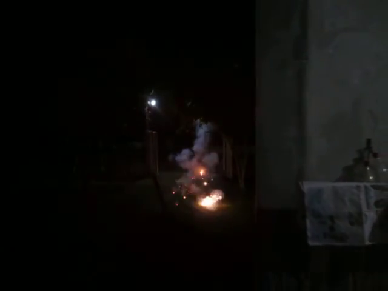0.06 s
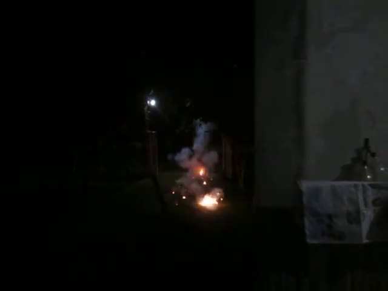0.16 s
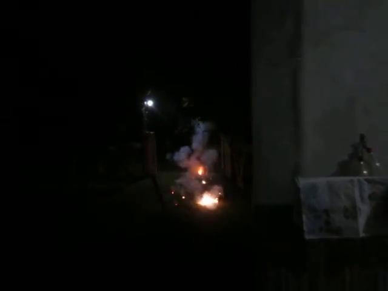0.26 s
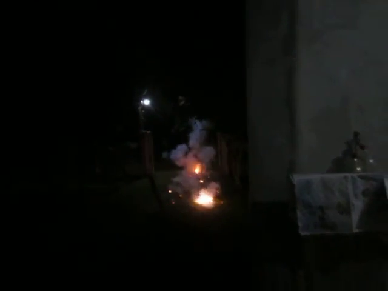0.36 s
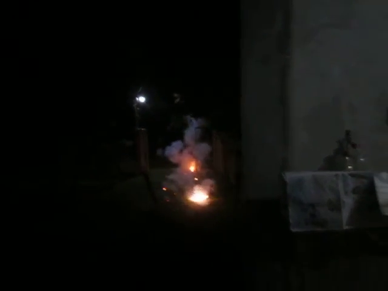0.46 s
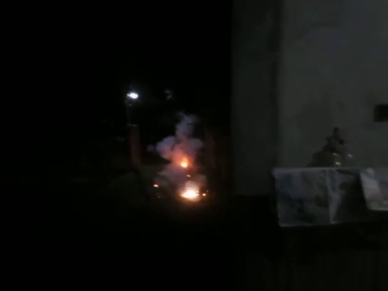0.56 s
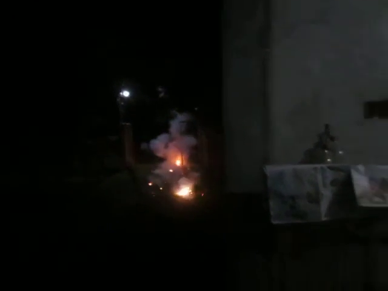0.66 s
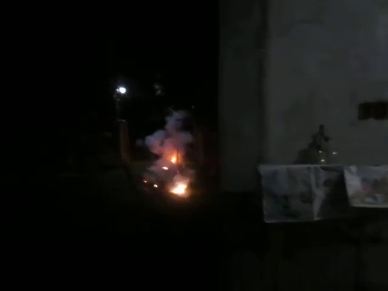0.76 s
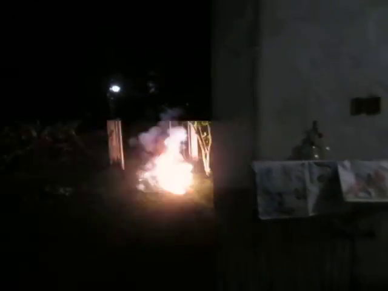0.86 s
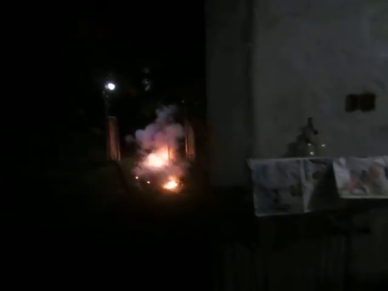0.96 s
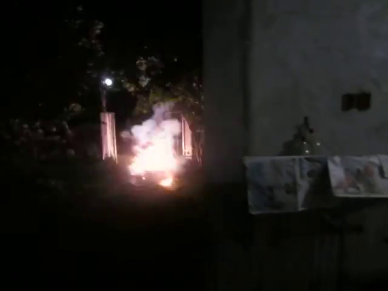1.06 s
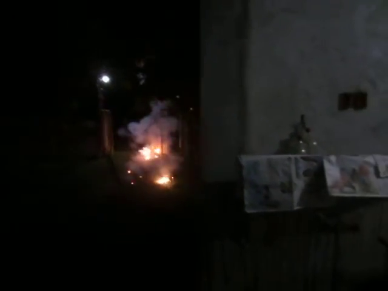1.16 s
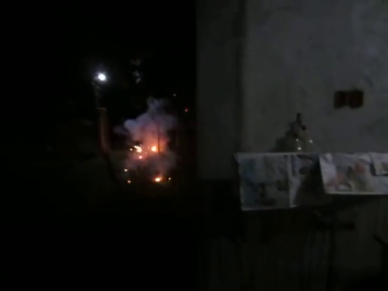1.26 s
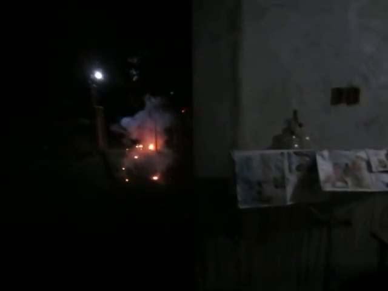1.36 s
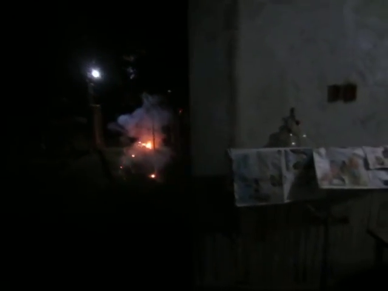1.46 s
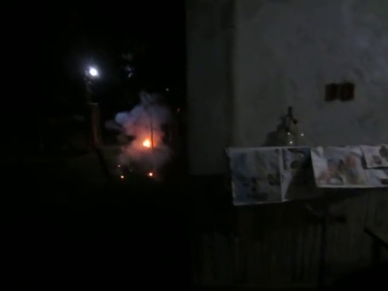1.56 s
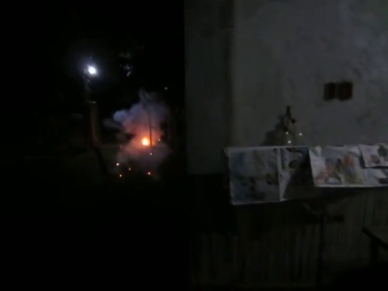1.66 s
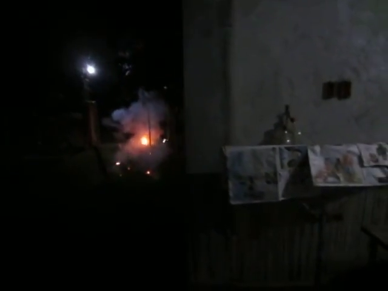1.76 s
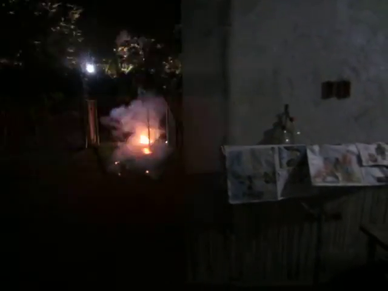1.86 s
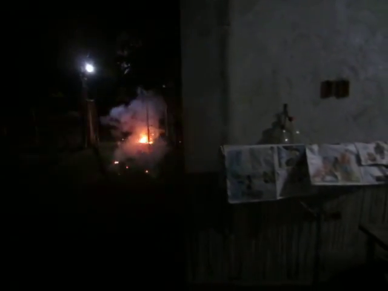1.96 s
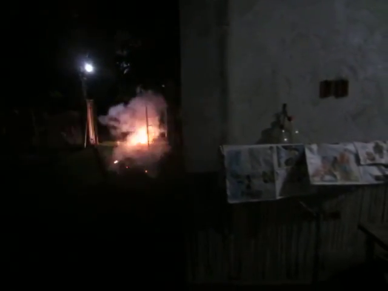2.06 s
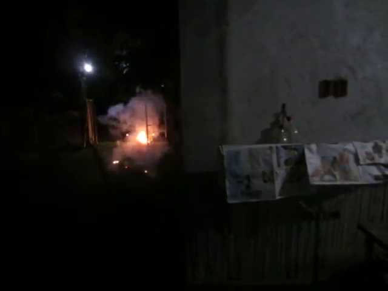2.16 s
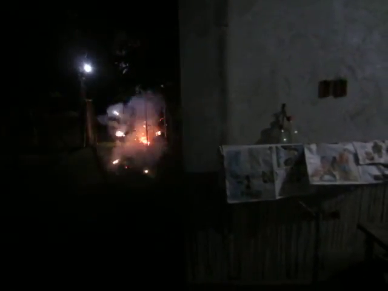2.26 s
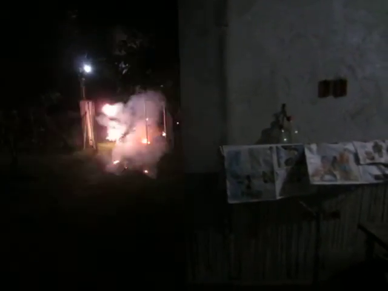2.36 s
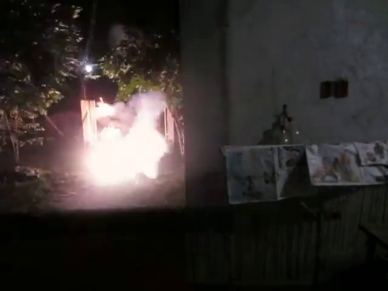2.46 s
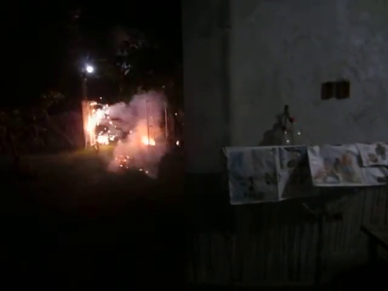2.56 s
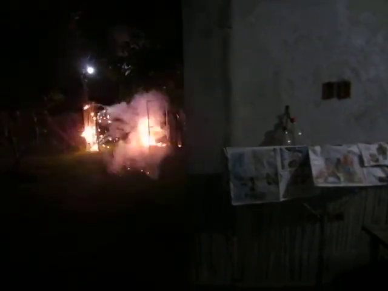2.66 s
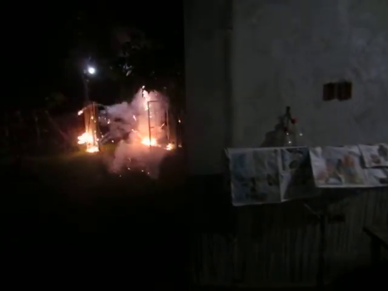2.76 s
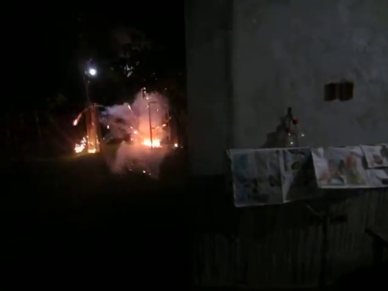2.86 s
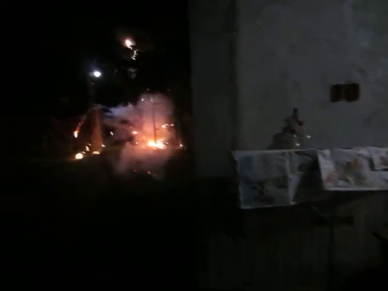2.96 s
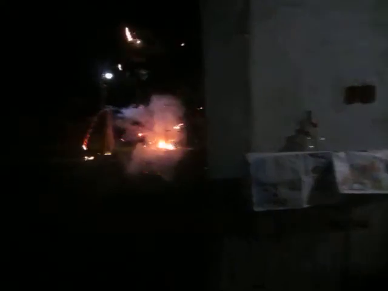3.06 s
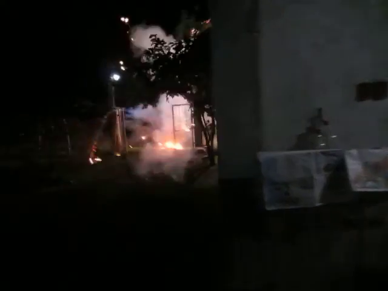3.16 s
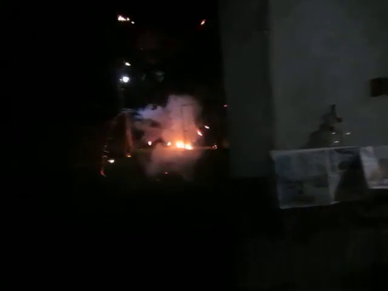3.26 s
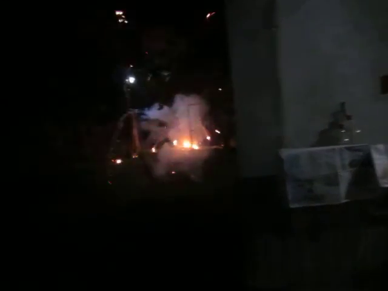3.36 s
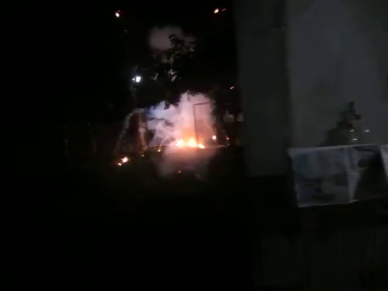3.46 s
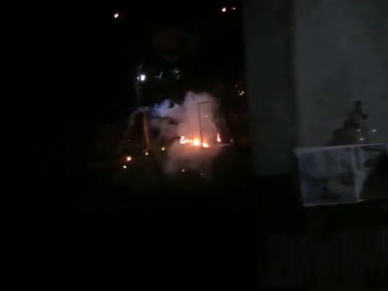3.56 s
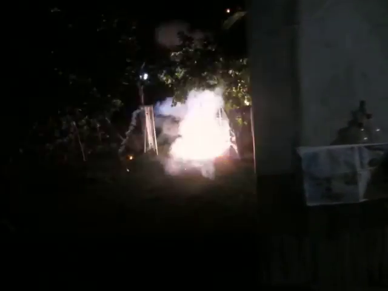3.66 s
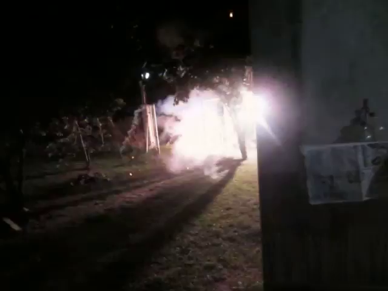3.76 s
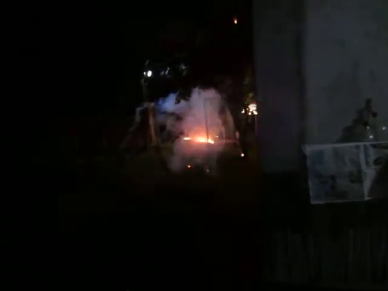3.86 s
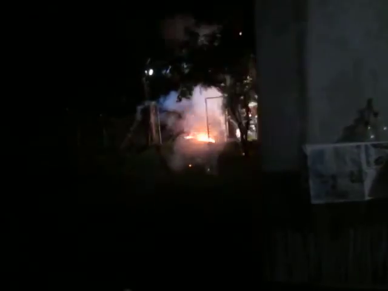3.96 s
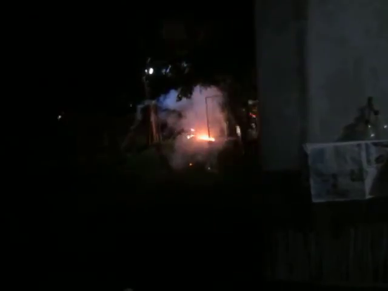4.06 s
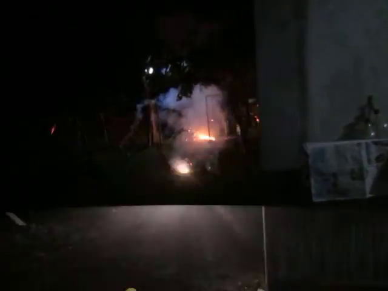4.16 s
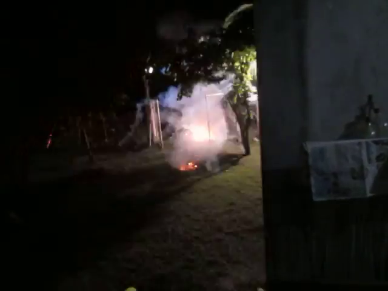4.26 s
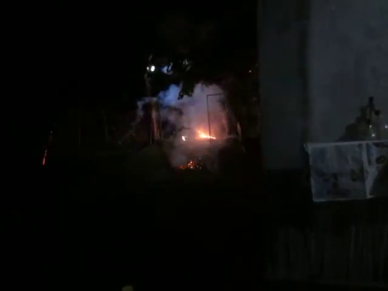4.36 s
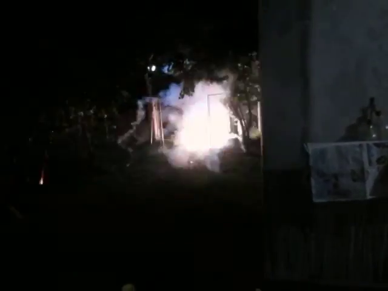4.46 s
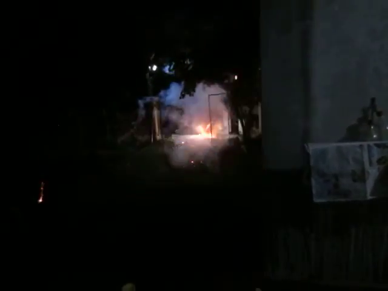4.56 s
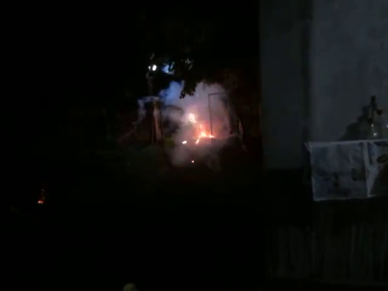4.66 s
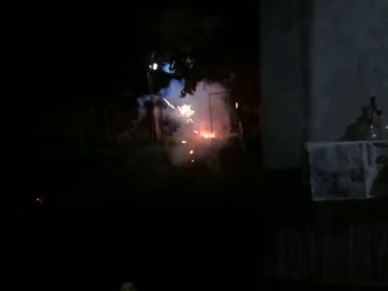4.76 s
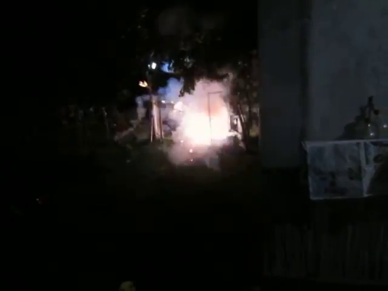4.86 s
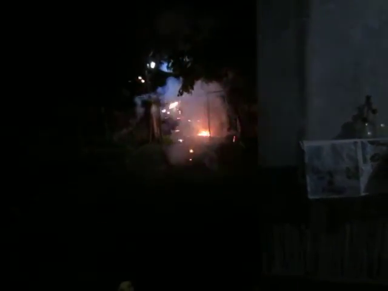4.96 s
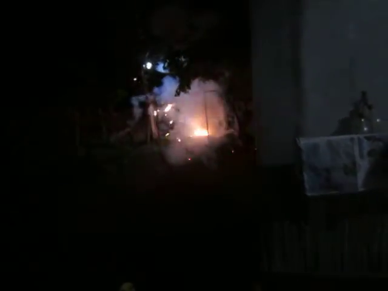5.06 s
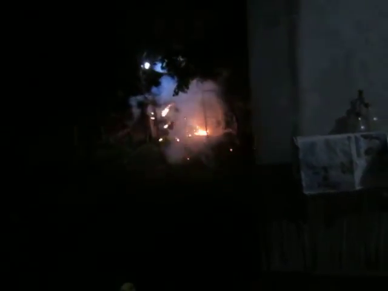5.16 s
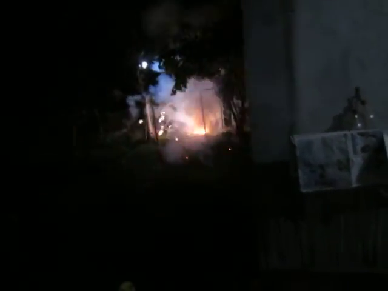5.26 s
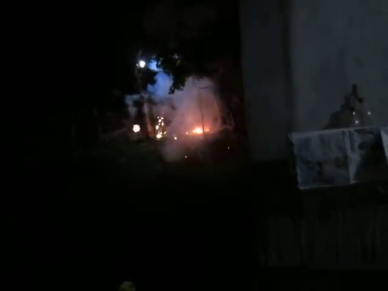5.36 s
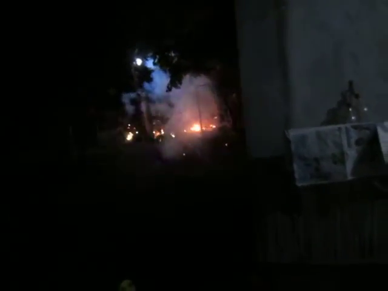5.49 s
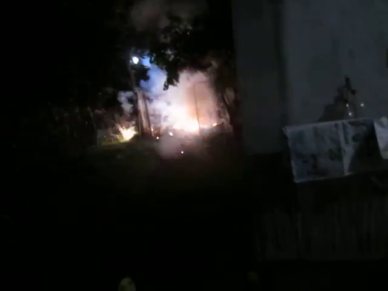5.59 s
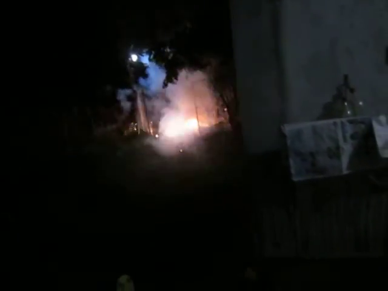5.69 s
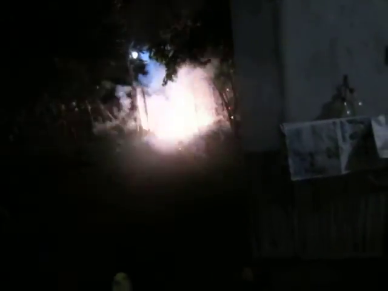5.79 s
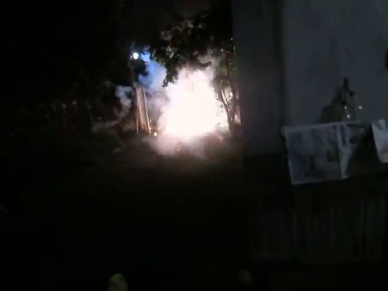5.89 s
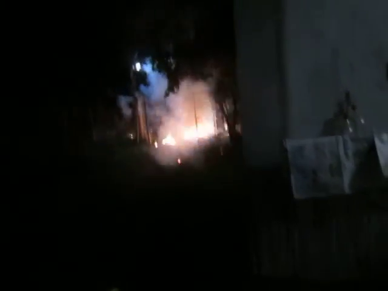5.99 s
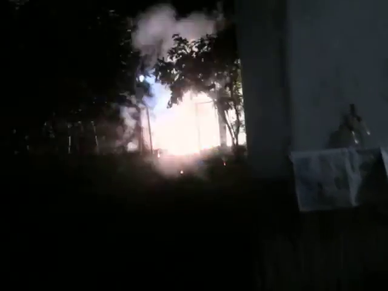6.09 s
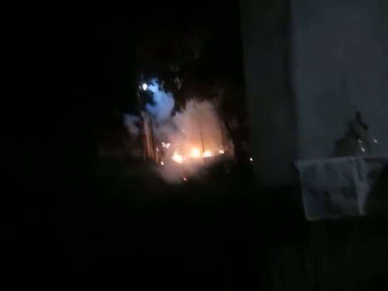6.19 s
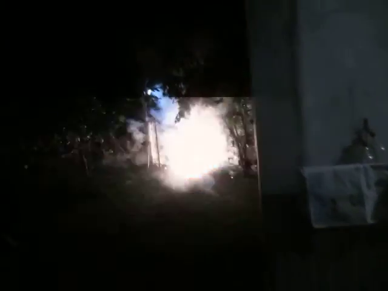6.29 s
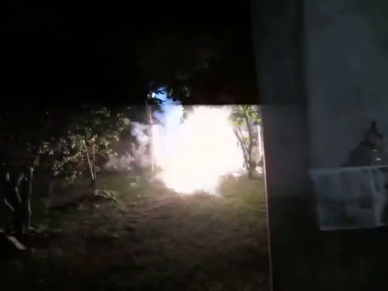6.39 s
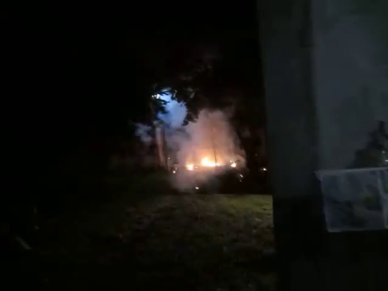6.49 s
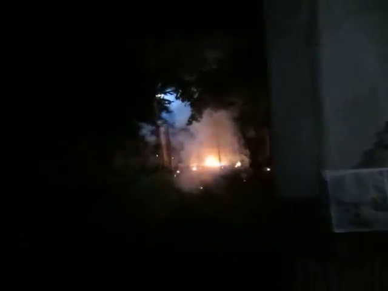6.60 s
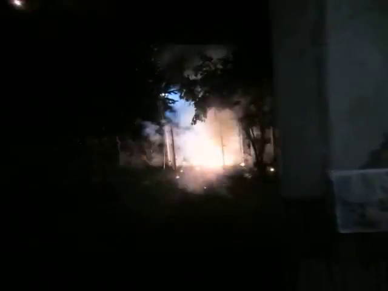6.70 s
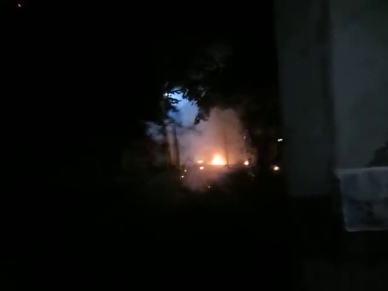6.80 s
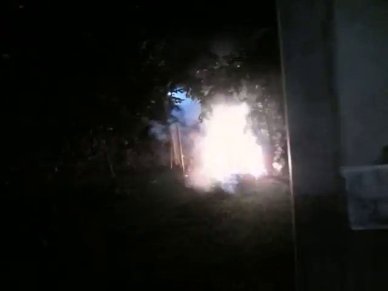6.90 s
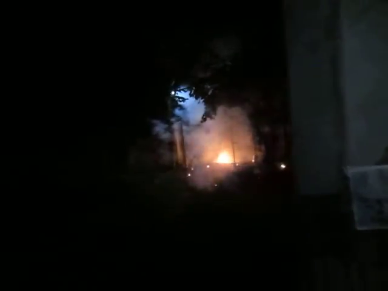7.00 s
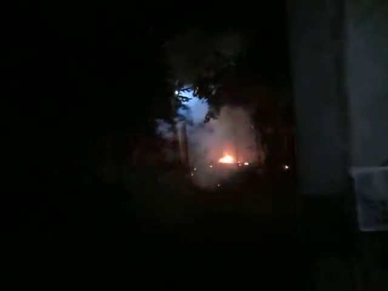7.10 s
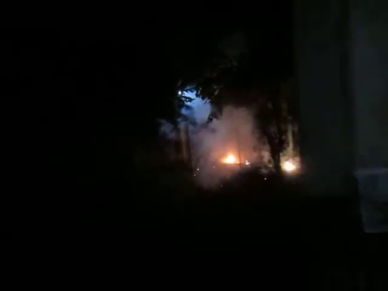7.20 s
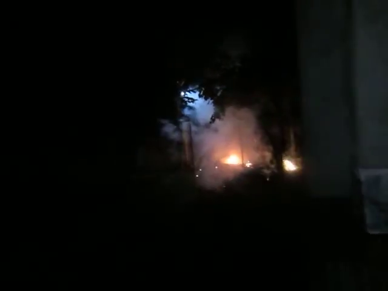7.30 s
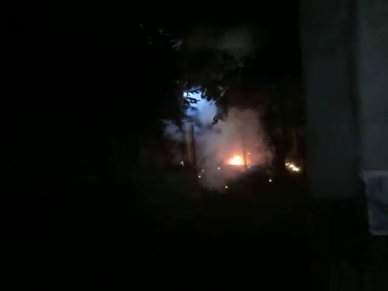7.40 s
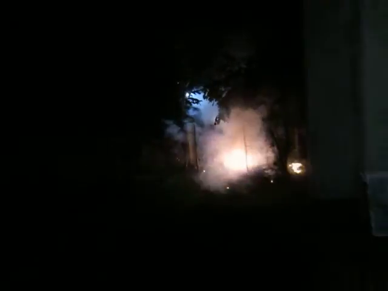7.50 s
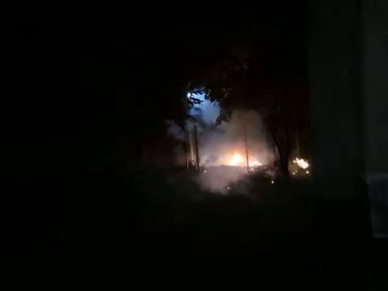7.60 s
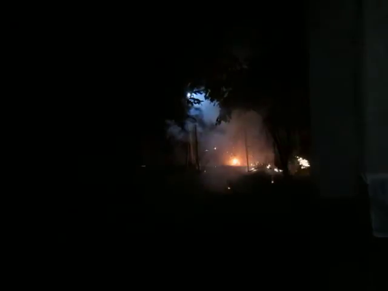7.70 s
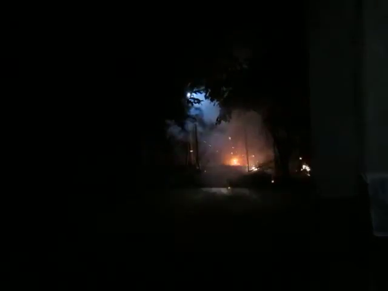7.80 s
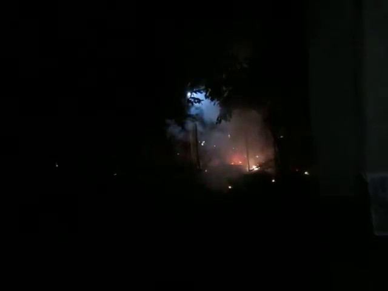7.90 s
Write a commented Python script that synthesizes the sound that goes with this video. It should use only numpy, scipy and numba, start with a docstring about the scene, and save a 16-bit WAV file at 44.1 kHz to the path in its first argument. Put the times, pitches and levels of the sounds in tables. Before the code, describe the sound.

A phone on a porch picks up a string of firecrackers in a dark yard. About one bang a second at first, with weak, rounded pops and a small whoosh in the gaps, then irregular cracks several times a second, some in tight bursts. Each has a crunchy, flattened attack, a quick wall slap and a grainy outdoor tail of less than a second. Quiet low air lies beneath, and the firing never stops before the end.

```python
"""Under a murmur of night air, a string of firecrackers goes off in a yard, some metres from a phone on a porch.
Single bangs come first: each is a shock pulse that slaps off the house wall and washes through trees and fences.
Among the bangs, mostly the early ones, weak crackers pop as round, dulled pulses; near the start one flares
in a whoosh of shaped noise. Then the bangs crowd together, some in short runs along the fuse, up to the end.
Throughout, the blasts overload the microphone and a limiter holds them down."""
import sys
import numpy as np
from scipy import signal
from scipy.fft import rfft, irfft
from scipy.io import wavfile
from scipy.ndimage import minimum_filter1d
from numba import njit

SR = 44100
rng = np.random.default_rng(int(sys.argv[2]) if len(sys.argv) > 2 else 0)


def wav_record(signal):
    """Record a signal, one row per channel, as 16-bit PCM in the file named by sys.argv[1]."""
    frames = np.transpose(np.atleast_2d(signal))
    bounded = np.clip(frames, -1, 1)
    # unit amplitude maps onto the largest positive 16-bit level
    quanta = np.round(bounded * 32767).astype(np.int16)
    wavfile.write(sys.argv[1], SR, quanta)


N = 350154
FREQS = np.arange(N // 2 + 1) * SR / N  # Hz
SIDES = np.array([[1], [-1]])  # left, right


def undb(db):
    """Decibels to gain."""
    return 10 ** (np.asarray(db) / 20)


def curve(points, hz=FREQS):
    """Gain of (f/Hz, level/dB) points joined on a log-frequency axis."""
    f, db = np.transpose(points)
    return undb(np.interp(np.log(np.maximum(hz, 1)), np.log(f), db))


def colour(x, gain):
    """Causal filter with the given gain, built from its cepstrum."""
    cepstrum = irfft(np.log(gain), N)
    # fold the cepstrum forward in time: the filter then has minimum phase
    cepstrum[1:N // 2] *= 2
    cepstrum[N // 2 + 1:] = 0
    response = irfft(np.exp(rfft(cepstrum)), N)[:8192]
    return signal.oaconvolve(x, response[None], axes=1)[:, :N]


def butter(x, hz, kind, order=2):
    """Plain low-pass or high-pass."""
    return signal.sosfilt(signal.butter(order, hz, kind, fs=SR, output="sos"), x)


def add(out, x, s):
    """Mix x into out from time s on."""
    i = int(s * SR)
    out[:, i:i + x.shape[1]] += x[:, :N - i]


# how unlike the two ports hear diffuse sound: (f/Hz, level of side against mid/dB)
DIFFUSE_WIDTH = [(40, -10), (150, -21), (450, -21.5), (1200, -11.5), (4000, -9), (12000, -6)]


def diffuse(sizes=1):
    """Spectrum of sound arriving from all sides: shared mid noise plus a weaker opposed side noise."""
    mid, side = rfft(rng.standard_normal((2, N)) * sizes)
    return mid + SIDES * side * curve(DIFFUSE_WIDTH)


# spectral shape of the night air: (f/Hz, relative level/dB per Hz)
NIGHT_AIR = [(25, 10.5), (60, 10.5), (120, 7), (220, -0.5), (500, 4), (1200, -15.5), (3000, -32.5),
             (6000, -39.5), (12000, -58)]


def night(level_db=-42, swell_spread_db=1.8):
    """A low outdoor murmur: shaped diffuse noise whose level swells a little at random."""
    air = irfft(diffuse() * curve(NIGHT_AIR), N)
    swell_points = rng.normal(0, swell_spread_db, 160)
    swell_db = np.interp(np.arange(N), np.linspace(0, N, 160), swell_points)
    return air / air.std() * undb(level_db + swell_db)


# bangs along the string: (t/s, relative level/dB, level of direct wave against scatter/dB,
# bark f/Hz, crackers in a row)
STRING_BANGS = [(0.037, 2, -6, 565, 1), (0.9343, -1, -2, 840, 1), (1.9024, 2.5, -6.5, 540, 1),
                (2.0722, -2.5, -5, 637, 1), (2.5129, -1, -2, 690, 1), (2.695, -0.5, -5.5, 930, 1),
                (3.1537, -0.5, -6, 1100, 1), (3.243, -3.5, -19, 850, 1), (3.3876, -1, -1.5, 734, 1),
                (3.588, -3.5, -6.5, 710, 1), (3.721, 0.5, -2, 480, 1), (4.025, -7.5, -6, 620, 2),
                (4.165, -6, 3, 1120, 1), (4.242, 2.5, -5, 740, 1), (4.401, -7.5, -5, 980, 3),
                (4.577, -0.5, -8, 930, 2), (4.783, -3, 2, 640, 1), (4.938, -2.5, 1.5, 870, 1),
                (5.283, -3.5, -10.5, 520, 3), (5.492, -6.5, 1, 910, 1), (5.6096, -3, -3, 780, 2),
                (5.8207, -1, -13, 850, 1), (5.903, -2.5, -5, 593, 3), (6.159, -6.5, -13, 580, 1),
                (6.305, -1.5, -11, 790, 1), (6.38, -1, 5.5, 945, 1), (6.479, -2, 5, 550, 1),
                (6.586, 0.5, -9, 980, 1), (6.777, -5.5, -12, 800, 1), (6.881, -15, 0, 1270, 1),
                (6.9653, -4, 1.5, 494, 1), (7.1414, -4, 2, 570, 1), (7.4446, -4, -5.5, 1280, 2),
                (7.6032, -2, -6, 700, 2), (7.8891, 1, -13, 695, 1)]


def firings(fuse_s=0.058, fuse_spread=0.03, follower_db=0.12):
    """Each cracker in a run lights the next after a short piece of fuse: (t/s, dB, direct dB, bark Hz)."""
    shots = []
    slacks = rng.standard_normal(len(STRING_BANGS))
    for (s, db, clear_db, body_hz, run), slack in zip(STRING_BANGS, slacks):
        step_s = fuse_s * (1 + fuse_spread * slack)
        for k in range(round(run)):
            # each follower is slightly louder than the one before it
            shots.append((s + k * step_s, db + k * follower_db, clear_db, body_hz))
    return shots


def blast(ms):
    """A shock front, a falling overpressure and a longer suction, with the front drawn downwards."""
    u = np.arange(SR // 100) / SR * 1000 / ms
    return -(1 - u) * np.exp(-u)


# slaps from house wall and porch: (nominal delay t/s, relative level/dB)
WALL_SLAPS = [(.0031, -6), (.005, -9), (.0107, -13), (.046, -20)]


def rays(echo_db, ground_s=0.00018, ground_db=-4, wander=0.056, trunk_db=-13, trunk_s=0.025, count=14):
    """Direct wave and its bounce off the ground, then slaps from the house and from posts and trunks."""
    response = np.zeros((2, SR))
    ray = np.array([[0, 0.065, 0.96], [1, 0.03, 0.1]])  # the right port is reached first
    add(response, ray, 0)
    add(response, undb(ground_db) * ray, ground_s)
    for delay, db in WALL_SLAPS:
        wandered_s = delay * np.exp(wander * rng.standard_normal())
        # from the wall, the left port is reached first
        add(response, undb(db + echo_db) * ray[::-1], wandered_s)
    for where, size, side in rng.random((count, 3)):
        delay = 0.0088 + 0.18 * where ** 2
        # the longer the detour, the weaker the echo
        gain = undb(trunk_db + echo_db) * size / (1 + delay / trunk_s)
        add(response, gain * ray[::1 if side < .5 else -1], delay)
    return response


# scatter from trees and fences: (f/Hz, relative level/dB, t60/s)
YARD_SCATTER = [(50, 6.5, 0.84), (122, 0.5, 0.6), (231, -3, 0.84), (440, 0.5, 0.68), (1070, 0.5, 0.65),
                (2030, 0.5, 0.63), (3740, -1, 0.59), (8250, -2.5, 0.5), (15000, 2.5, 0.31)]


def yard(grain_db=2.0, build_s=0.00034, hold_s=0.03, far_db=-25, far_t60_s=1.76, far_dull_hz=1800,
         scatter_db=-14, fence_s=0.085, fence_width_s=0.027, early_db=4):
    """Frequency bands of countless small echoes, and how each band dies away after a blast."""
    t = np.arange(SR) / SR
    # the noise changes size every 40 samples, which makes it grainy
    sizes = np.repeat(undb(grain_db * rng.standard_normal(N // 40 + 1)), 40)[:N]
    echoes = diffuse(sizes / np.sqrt(np.mean(sizes ** 2)))
    centres = np.log([row[0] for row in YARD_SCATTER])
    # the echoes thicken within a millisecond and drop once the farthest fence has answered
    early = undb(early_db * (1 - np.tanh((t - fence_s) / fence_width_s)) / 2)
    build = 1 - np.exp(-(t / build_s) ** 2)
    shape = build * early * np.minimum(10 * (1 - t), 1)
    bands, fades = [], []
    for own, (hz, db, t60) in zip(np.eye(len(YARD_SCATTER)), YARD_SCATTER):
        bands.append(irfft(echoes * np.interp(np.log(FREQS + 1), centres, own), N))
        # near walls keep the level up at first; far houses return a long dull roll
        near = np.exp(-np.log(1000) * (np.hypot(t, hold_s) - hold_s) / t60)
        far_gain = undb(far_db) / np.hypot(1, hz / far_dull_hz)
        far = far_gain * np.exp(-np.log(1000) * t / far_t60_s)
        fades.append(undb(db + scatter_db) * np.hypot(near, far) * shape)
    return np.float32(bands), np.float32(fades)


def scatter(bands, fades, tilt_db=0):
    """The string jumps about, so each cracker has its own wash of small echoes; tilt is in dB per octave."""
    start = rng.integers(N - SR)
    octaves = np.clip(np.log2([row[0] / 1000 for row in YARD_SCATTER]), -1, 2)
    tilt = np.float32(undb(tilt_db * octaves))[:, None]
    return np.einsum("bct,bt->ct", bands[:, :, start:start + SR], fades * tilt)


def crackers(space, direct_db=19, wash_db=-4, echo_db=-4, direct_ms=0.77, wash_ms=0.66, front_hz=3000,
             body_db=-2, body_q=0.71, base_tilt_db=0.5, tilt_per_direct_db=0.1):
    """Every cracker sends a heavy blast straight to the porch and a thinner one through the foliage."""
    out = np.zeros((2, N))
    for s, db, clear_db, body_hz in firings():
        # a bigger charge makes a longer blast
        stretch = undb(db) ** (1 / 3)
        wave = butter(blast(direct_ms * stretch), front_hz, "low", order=1)
        direct = signal.oaconvolve(rays(echo_db), wave[None], axes=1)
        add(out, undb(db + clear_db + direct_db) * direct, s)
        # each paper tube tears differently and barks at its own broad pitch
        thin = blast(wash_ms)
        body = signal.lfilter(*signal.iirpeak(body_hz, body_q, fs=SR), thin)
        bark = thin + undb(body_db) * body
        # a cracker in the open sounds brighter than a screened one
        tilt_db = base_tilt_db + tilt_per_direct_db * clear_db
        wash = signal.oaconvolve(scatter(*space, tilt_db), bark[None], axes=1)
        add(out, undb(db + wash_db) * wash, s)
    return out


# weak crackers that burst dully: (t/s, relative level/dB, relative scatter level/dB, low-pass f/Hz)
WEAK_POPS = [(0.633, -37, 5, 303), (1.3697, -16.5, -16, 450), (1.532, -31.5, -15, 538),
             (1.799, -29, -20, 750), (5.199, -7, -14, 750)]


def pops(space, ms=0.55, direct_db=10, echo_db=-6, grass_s=.028, ring_hz=500, ring_s=0.0092, ring_db=-17):
    """Weak crackers split slowly on the ground: a round, hollow pulse whose longer paths the grass swallows."""
    out, t = np.zeros((2, N)), np.arange(SR) / SR
    grass = np.exp(-t / grass_s)
    # the burst paper tube rings for a few cycles
    ring = np.sin(2 * np.pi * ring_hz * t) * np.exp(-t / ring_s)
    wave = undb(ring_db) * ring[None, :2048]
    add(wave, blast(ms)[None], 0)
    for s, db, scatter_db, hz in WEAK_POPS:
        paths = undb(direct_db) * rays(echo_db) * grass
        response = paths + undb(scatter_db) * scatter(*space)
        add(out, undb(db) * signal.oaconvolve(response, butter(wave, hz, "low"), axes=1), s)
    return out


# powder that flares without bursting: (t/s, fall time t/s, level/dB)
POWDER_FLARES = [(0.776, 0.14, -31.5)]
# spectral shape of its rush of gas: (f/Hz, relative level/dB per Hz)
FLARE_GAS = [(90, -5), (230, 5.5), (500, -1), (1000, -21), (2500, -33.5), (7000, -46), (12000, -52)]


def flares(rise_s=0.0023):
    """A split cracker burns off in a soft whoosh with a faint hiss: shaped noise that rises fast and fades."""
    out, gas = np.zeros((2, N)), irfft(diffuse() * curve(FLARE_GAS), N)
    t = np.arange(SR // 2) / SR
    for s, length, db in POWDER_FLARES:
        envelope = (1 - np.exp(-t / rise_s)) * np.exp(-(t / length) ** 2)
        add(out, undb(db) * gas[:, :len(t)] / gas.std() * envelope, s)
    return out


# air resonances and dips of the porch: (f/Hz, width f/Hz, level/dB)
PORCH_AIR = [(177, 22, 3), (215, 25, -1.5), (325, 22, 2.5), (349, 16, -4), (374, 24, 3), (420, 50, 1.5),
             (574, 25, 2.5), (750, 220, 1.5)]


def scene():
    """Bangs, pops, a flare and night air, heard through the resonances of the porch."""
    space = yard()
    porch_db = sum(db / (1 + (2 * (FREQS - hz) / width) ** 2) for hz, width, db in PORCH_AIR)
    return colour(crackers(space) + pops(space) + flares() + night(), undb(porch_db))


# left against right: (f/Hz, level/dB)
LEFT_LEAN = [(40, 3.5), (400, 2.5), (1000, 1.7), (2000, 0.5), (3500, -1.2), (12000, -1)]
# phase by which the left port leads: (f/Hz, phase/radians)
LEFT_LEAD = [(0, 0.18), (450, 0.21), (1200, 0.16), (3500, 0), (8000, .27), (13000, .08)]


def ports(x):
    """The two microphone ports differ in level and in phase, half of each difference on either side."""
    hz, radians = np.transpose(LEFT_LEAD)
    lead = np.interp(FREQS, hz, radians)
    return irfft(rfft(x) * curve(LEFT_LEAN) ** (SIDES / 2) * np.exp(1j * lead * SIDES / 2), N)


@njit
def follow(x, attack, release):
    """Level follower that rises fast and falls slowly."""
    out, e = np.empty(len(x)), 0.
    for i in range(len(x)):
        e += (x[i] - e) * (attack if x[i] > e else release)
        out[i] = e
    return out


def limiter(x, limit=0.56, deepest=0.61, hold_s=0.19, attack_s=0.0045, release_s=0.14):
    """Turns down within milliseconds, stays down for a while after each peak, then recovers."""
    peak = np.abs(x).max(axis=0)
    cut = np.minimum(1 - limit / np.maximum(peak, limit), deepest)
    half = int(hold_s * SR / 2)
    # the deepest cut of the last hold_s
    held = -minimum_filter1d(-cut, 2 * half + 1, origin=half, mode="constant")
    return x * (1 - follow(held, 1 / (attack_s * SR), 1 / (release_s * SR)))


# microphone colour, with a notch in the top octave: (f/Hz, level/dB)
MIC_COLOUR = [(20, -9), (60, 3), (400, -1.5), (1200, 4.5), (2500, 4.5), (4000, 1.5), (6500, 2.5),
              (8500, -0.5), (10500, -10), (11500, -23), (12050, -49), (12900, -20), (14000, -14),
              (16000, -18)]


def record(dry, bass_hz=190, ceiling=0.79, bias=0.026, knee=3.44, top_hz=16000):
    """The phone thins the bass, overloads on the blasts, and turns itself down while they last."""
    drive = butter(dry, bass_hz, "high") / ceiling + bias
    # lopsided overload turns each blast into a low thump as well
    crushed = ceiling * (drive / (1 + np.abs(drive) ** knee) ** (1 / knee) - bias)
    coloured = colour(butter(crushed, 6.7, "high"), curve(MIC_COLOUR))
    heard = limiter(ports(coloured))
    steep_low_pass = signal.ellip(8, .2, 70, top_hz, fs=SR, output="sos")
    return signal.sosfilt(steep_low_pass, np.clip(heard, -1, 1))


dry = scene()
out = record(dry)
wav_record(out)
```